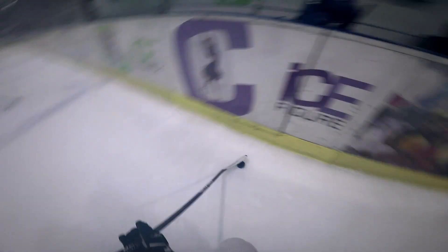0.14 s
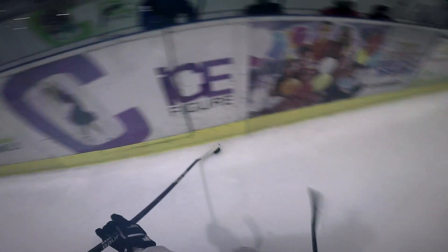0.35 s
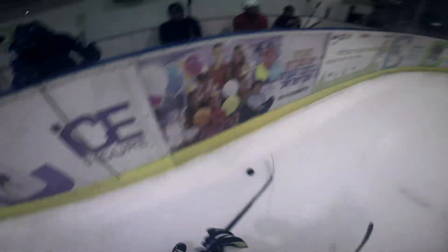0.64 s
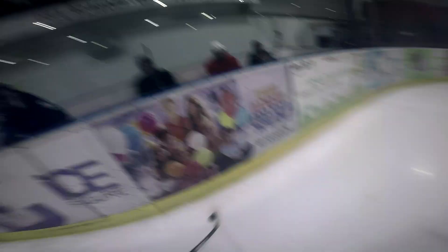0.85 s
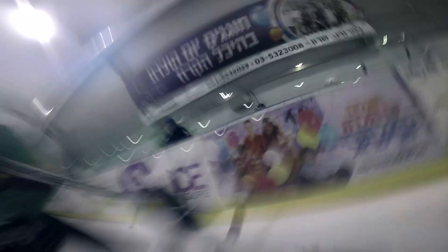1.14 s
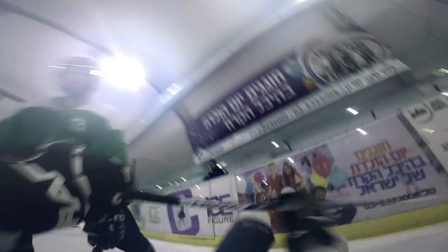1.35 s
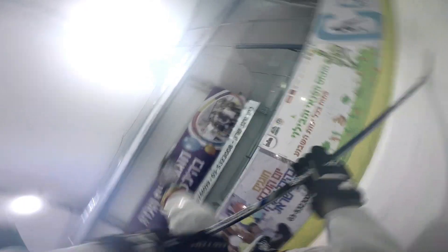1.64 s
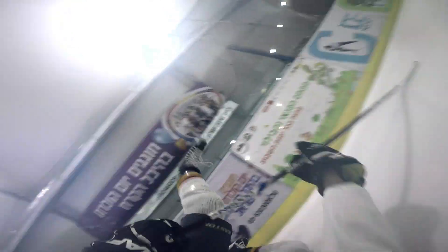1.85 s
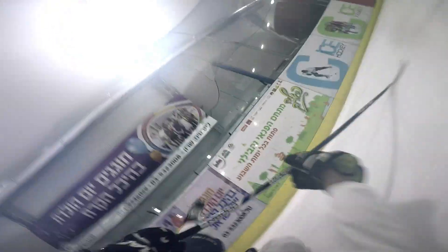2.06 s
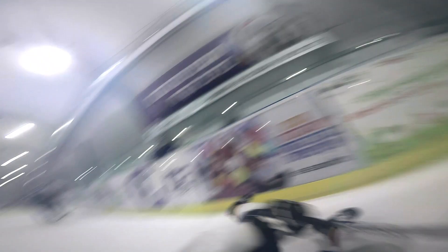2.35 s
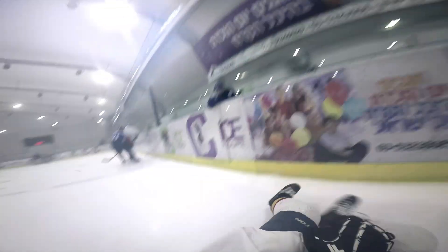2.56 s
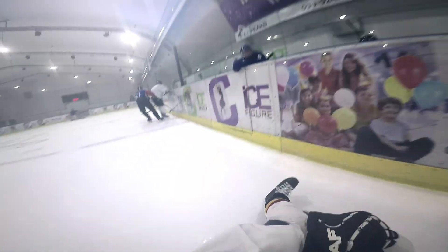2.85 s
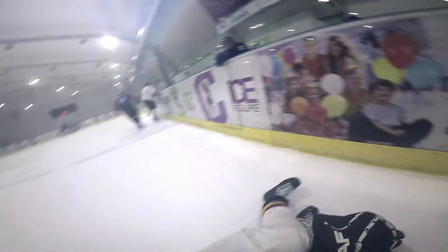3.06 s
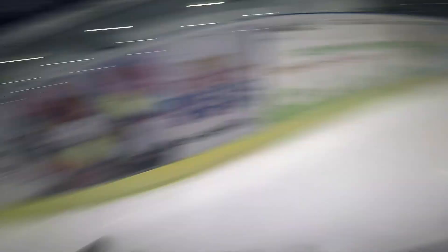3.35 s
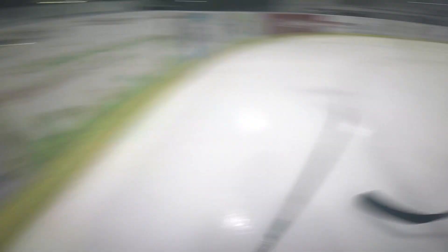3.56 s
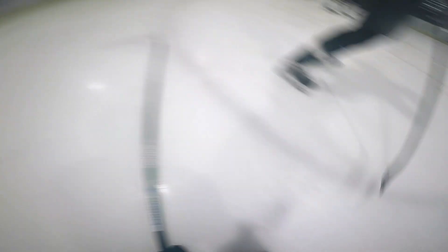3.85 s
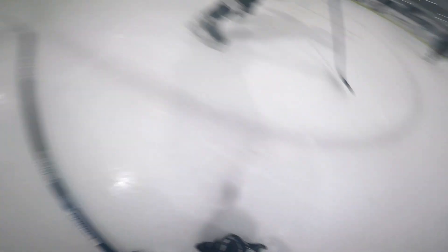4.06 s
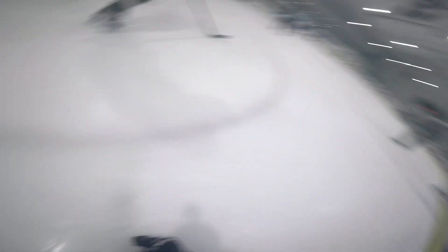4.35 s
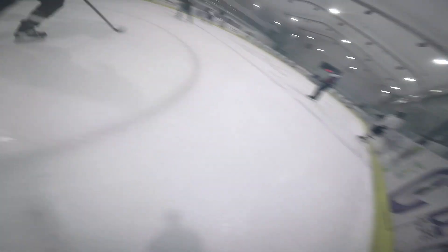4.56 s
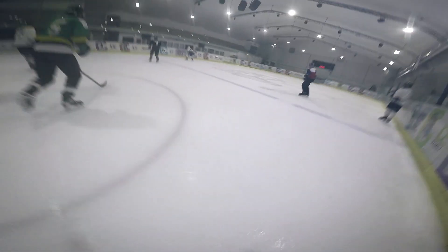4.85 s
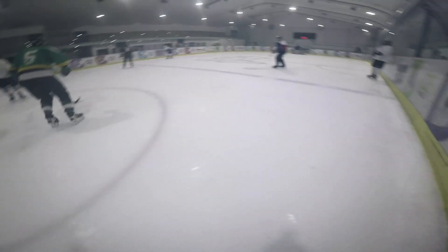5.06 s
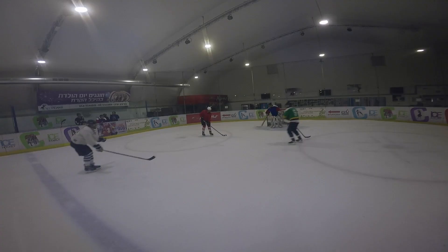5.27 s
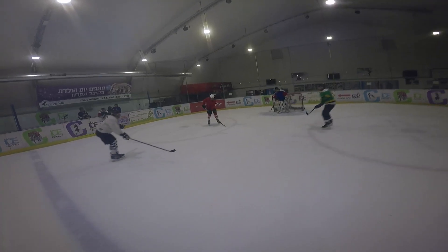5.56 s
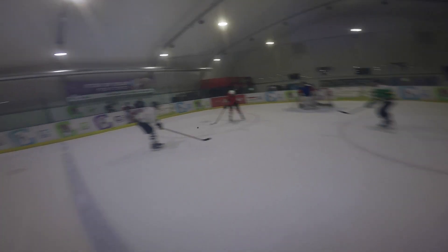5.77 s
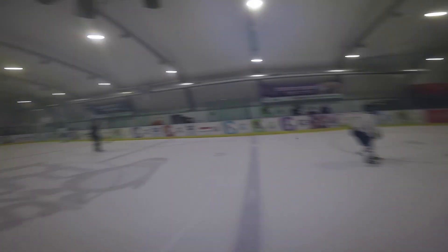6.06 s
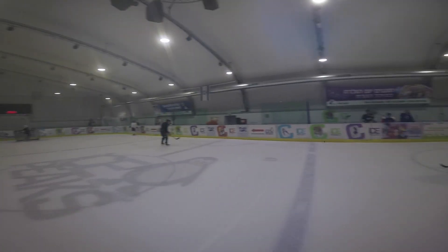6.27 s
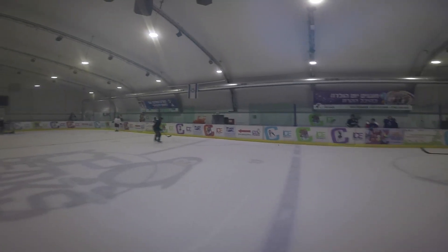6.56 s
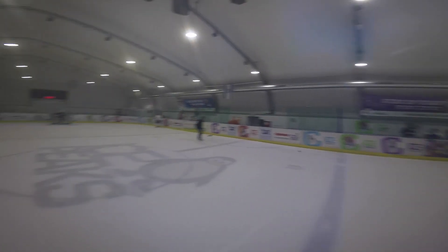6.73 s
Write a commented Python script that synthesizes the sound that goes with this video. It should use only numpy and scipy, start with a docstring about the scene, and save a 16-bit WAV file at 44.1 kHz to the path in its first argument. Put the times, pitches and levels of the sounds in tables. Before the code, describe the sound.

Helmet-level ice hockey: gritty carving, a burst of hard clacks and padded thuds, a hushed fall, then returning scrapes and echoing shots.

```python
"""First you hear skate blades scraping and spraying ice: ice hockey in an indoor rink, heard at a player's helmet.
Sticks, puck and gear clack as short rings; the player collides and falls by the boards with padded thuds.
The skating, tiny ice cracks ringing the blades, drops at the collision and comes back; later shots boom.
Moving air and head motion sway the camera mount as a low rumble, over a dull hall wash and a faint whine."""
import sys
import numpy as np
from scipy import signal
from scipy.fft import rfft
from scipy.io import wavfile
from scipy.ndimage import uniform_filter1d

SR = 44100
rng = np.random.default_rng(int(sys.argv[2]) if len(sys.argv) > 2 else 0)


def digitize_waveform(pressure):
    """Quantize a signal to 16-bit integers and store it at the path in sys.argv[1].

    Rows of a 2-D input are taken as channels; values are limited to [-1, 1].
    """
    field = np.atleast_2d(pressure).T
    bounded = np.clip(field, -1, 1)
    quanta = np.round(bounded * 32767).astype(np.int16)
    wavfile.write(sys.argv[1], SR, quanta)


N = 304147
TIME = np.arange(N) / SR  # seconds

# All levels are relative; most sources also apply a trim.
# Skating sound before the collision: (time [s], scrape level [dB], treble level [dB])
BEFORE_LEVELS = [(0, -26, -30.5), (.07, -26, -42), (.19, -22, -36), (.31, -30.5, -46.5), (.63, -28, -40.5),
                 (.82, -33.5, -53), (1.05, -31, -43), (1.2, -36, -47)]
# Skating sound after it, low at first: (time [s], scrape level [dB], treble level [dB])
AFTER_LEVELS = [(1.29, -55, -60.5), (1.7, -49.5, -55), (2.18, -37, -46.5), (2.32, -32.5, -46),
                (2.56, -32, -53), (2.76, -28.5, -50), (3.04, -31.5, -46), (3.25, -30.5, -48.5),
                (3.35, -36.5, -52.5), (3.99, -34.5, -44), (4.29, -34, -50), (4.47, -28, -45.5),
                (5.02, -32, -51.5), (5.46, -37, -48.5), (5.83, -32.5, -47), (6.26, -33, -53),
                (6.57, -31.5, -58), (6.9, -33, -61)]
CRASH_S, CUT_S = 1.245, 0.042  # when the skating sound starts to drop, and how long the change takes
SCRAPE_DB, SPRAY_DB, WASH_DB = -0.5, 3, -10  # trims on those levels
GLIDE_ENDS_S, HANDOVER_S = 5.33, 0.08  # the player's own glide starts to fade out; length of the fade

# Tone colour of blades scraping: (frequency [Hz], level [dB])
SCRAPE_SPECTRUM = [(300, -16.5), (700, -14.5), (1000, -4.5), (1300, -0.5), (2000, 2.5), (2400, -8),
                   (3100, -4.5), (4000, -17), (5000, -19.5), (8000, -44), (16000, -40)]
# Tone colour of the fine ice spray: (frequency [Hz], level [dB])
SPRAY_SPECTRUM = [(1500, 4), (3000, 0.5), (4200, 1), (5500, -4), (6600, -6), (7700, -2), (8600, -12),
                  (10500, -12.5), (12500, -17.5), (15000, -18), (16000, -45)]
# Resonances of blades and camera shell: (frequency [Hz], width [Hz], level [dB])
BLADE_RESONANCES = [(1580, 19, 0), (1910, 38, -3), (2566, 460, 2.5), (3990, 450, 0.5), (4830, 87, 0),
                    (5890, 660, 0), (6440, 110, -24), (7330, 280, -16), (9760, 770, -1)]
# Tone colour of the other skaters' scrape: (frequency [Hz], level [dB])
OTHERS_SPECTRUM = [(300, -15), (650, -14.5), (900, -1), (1400, 2), (2150, -2.5), (3000, 1), (3500, -4),
                   (4100, -7.5), (5000, -17.5), (8000, -40), (16000, -42)]
# Resonances of the other skaters' blades: (frequency [Hz], width [Hz], level [dB])
OTHERS_RESONANCES = [(1174, 20, -5), (1660, 120, -4), (1854, 75, 6.5), (2370, 94, 7), (2710, 180, 2),
                     (3880, 190, -3), (5820, 120, 13)]
SCRATCH_RATE, SCRATCH_DB = 40, -13.5  # larger chips per s, level before the scrape's loudness curve
SPRAY_MIRROR = 0.42  # strength of the spray's ice reflection, direct sound = 1
SQUEAK_HZ, SQUEAK_OCTAVES = 1905, 0.555  # centre pitch, and range of starting pitches
SQUEAK_S, SQUEAK_DB = 0.028, -14.5  # middle length, level relative to the glide

# A carving blade sings:
# (start [s], length [s], level [dB], centre [Hz], slide [octaves], width [share of the pitch])
BLADE_CARVES = [(0, 0.078, -28.5, 960, 0.14, 0.14), (0.101, 0.23, -31.5, 978, -0.13, .22),
                (0, 0.17, -27, 2310, -0.15, 0.12), (0.122, 0.093, -21, 1890, 0.082, .06),
                (.23, 0.079, -31, 2140, .05, .05), (0.044, 0.086, -34, 6030, -.45, .14),
                (0.549, .11, -31.5, 1954, -0.023, 0.037), (0.672, 0.26, -37, 1930, -0.11, 0.067),
                (2.183, .14, -53, 6740, -0.017, .08), (2.296, 0.31, -31.5, 2010, -0.096, .17),
                (2.35, .12, -55, 11300, .05, .08), (2.777, 0.16, -53, 7200, .06, 0.071),
                (2.877, 0.18, -43, 5360, 0.13, 0.18), (3.047, .17, -47, 7170, 0.016, .06),
                (3.07, .09, -53, 8650, .03, .07), (3.325, 0.17, -33, 1640, 0.091, .13),
                (3.628, .032, -21.5, 1856, -0.028, 0.05), (3.742, 0.25, -32, 1903, .05, 0.13),
                (3.8, 0.26, -36.5, 1597, -.04, .12), (3.861, .12, -40.5, 4360, 0.19, .14),
                (3.87, .17, -52, 7000, 0.00086, 0.092), (3.903, .14, -56, 9700, 0.15, 0.11),
                (4.599, .8, -41, 1503, 0, 0.057), (5.672, 0.17, -37, 7620, -0.012, 0.075),
                (6.745, 0.18, -29, 1587, 0.021, 0.15)]
# An edge skids sideways and throws snow: (start [s], length [s], level [dB], fine powder level [dB])
EDGE_SKIDS = [(.0, 0.14, -46, 10), (0.088, 0.12, -32.5, -6), (0.167, 0.065, -49, 5.5),
              (0.577, 0.3, -50, 3.5), (0.978, 0.093, -53.5, 12.5), (2.298, 0.22, -52.5, 2.5),
              (2.764, 0.21, -43.5, -19), (3.078, 0.22, -42.5, -21), (3.58, 0.16, -46.5, -13),
              (3.86, 0.11, -55, -8), (5.564, .11, -47, -21), (5.667, 0.074, -30, -17),
              (5.732, 0.071, -27, -25), (6.044, 0.058, -37.5, -25)]
# Tone colour of thrown snow: (frequency [Hz], level [dB])
SNOW_SPECTRUM = [(800, -4), (1600, 10), (2200, -4), (2900, 8.5), (3900, 6.5), (4700, -1.5), (5800, -0.5),
                 (7600, -7), (8600, -13), (11000, -17.5), (15000, -60)]
# Tone colour of fine powder: (frequency [Hz], level [dB])
POWDER_SPECTRUM = [(2000, -31), (4500, 6), (6300, 1.5), (7800, -0.5), (8800, -12), (10300, -6),
                   (12000, -14), (15000, -13), (16000, -30)]

# Stick, puck and gear clacks: (time [s], level [dB], main ring [Hz], second ring [Hz],
# second ring level [dB], crack level [dB], low knock level [dB])
CLACK_HITS = [(0.467, -14.5, 1670, 2170, -12, -30, -30), (.534, -6.5, 1880, 1400, -7, -22.5, -28),
              (0.546, -10, 1340, 2100, -12, -36, -36), (0.685, -11.5, 2000, 2730, -10, -25, -19),
              (0.702, -9.5, 1840, 2660, -14, -20.5, -17), (.764, -16, 1550, 2450, -1, -9.5, -3.5),
              (0.961, -29.5, 870, 1500, -7, -32, 5), (1.022, -3, 2190, 2770, -5, -29, -34),
              (1.069, -15, 1930, 1290, 1, -11.5, -9), (1.154, -8, 2710, 2150, -14, -13.5, -25),
              (1.169, -8, 1470, 2140, 1, -42, -35), (1.179, -12, 2090, 1360, -2, -33, -13),
              (1.197, -5.5, 1730, 2660, -9, -31, -14), (1.211, -13, 1860, 2600, -13, -28, -13),
              (1.22, -19, 1910, 2670, -5, -35, -30), (1.2528, 4.5, 2443, 1810, 0.5, -17, -28),
              (1.495, -26, 2090, 2530, -12, -30, -13), (1.511, -22.5, 1020, 2800, -5, -17, -8),
              (1.531, -18, 1830, 2590, -16, -16, -14), (1.589, -27, 1460, 2160, 1.5, -14, -20),
              (1.681, -0.5, 1880, 2650, -8.5, -26, -19), (1.748, -29, 2100, 2870, -6, -7, -27),
              (1.836, -38, 2020, 2820, 5, -28, -30), (1.861, -36, 1960, 2980, -3, -15, -24),
              (2.112, -15, 2220, 2620, -9, -44, -28), (2.17, -20, 2040, 3020, -1.5, -15, -18),
              (2.302, -25, 1880, 2900, -10, -20, -30), (2.335, -8, 1780, 2550, -9, -17, -49),
              (2.3615, -20, 1990, 2600, -9, -24, -35), (2.6, -15, 2700, 1660, -3, -28, -37),
              (3.116, -17, 2070, 2640, -2, -30, -35), (3.2857, -4.5, 1570, 3280, -8, -27, -23.5),
              (3.344, -26.5, 2650, 3600, -5, -11, -29), (3.638, -11, 1800, 1400, -12, -48, -44),
              (5.556, -23.5, 2780, 1800, -12, -14, -28), (5.577, -27, 2920, 5700, -8, -13, -33),
              (5.618, -31, 2800, 5800, -4, -16, -27), (6.316, -11.5, 1450, 3750, -12, -21, -26),
              (6.3312, -8.5, 3750, 2460, -2, -32, -41), (6.339, -15, 1650, 2650, 2, -30, -33)]
# Notes available to every clack: (frequency [Hz], level [dB], time to fall 60 dB [s])
CLACK_RESONANCES = [(1146, -3, 0.032), (1463, 8, 0.011), (1714, -4.5, 0.016), (1680, -11, 0.0046),
                    (1960, 5, 0.043), (2587, 2.5, 0.019), (2736, -11.5, 0.039), (3110, 2.5, 0.017),
                    (4300, -12, 0.027), (4600, -36, 0.006)]
# Tone colour of the sharp crack: (frequency [Hz], level [dB])
CRACK_SPECTRUM = [(1000, -7), (3000, 12), (4200, 13.5), (5100, 3.5), (6400, 6), (7800, -4.5), (8700, -7.5),
                  (11500, -10), (16000, -30)]
# A harder blow stays in contact and rings shorter: 60 dB decay at 0 dB, and the level step that halves it
RING_T60_S, RING_HALVING_DB = 0.017, 42

# Dead raps of plastic gear against the helmet: (time [s], level [dB], pitch [Hz])
PLASTIC_RAPS = [(0.778, -8.5, 1250), (1.1988, 2.5, 1390), (1.2345, -11, 1500), (1.2438, -3, 1450),
                (1.6208, -13.5, 1440), (1.887, -11.5, 1350)]
RAP_T60_S = 0.0041  # 60 dB decay of the upper note
RAP_LOW_RATIO, RAP_LOW_DB = 0.63, -10.5  # lower note relative to the upper one

# Padded bodies hit boards and ice: (time [s], level [dB], pitch [Hz], slap of cloth level [dB])
PADDED_THUDS = [(0.751, -11.5, 195, -1.5), (0.764, -17, 290, -16), (.961, -10, 280, -6),
                (1.022, -8, 150, -6), (1.046, -20.5, 190, 3), (1.195, -7, 167, -17), (1.241, -13, 149, -25),
                (1.575, -12, 185, -23), (1.616, -29, 252, -2), (1.684, -7.5, 178, -16),
                (1.704, -31, 252, -18), (1.733, -11, 200, -15), (1.861, -19, 177, -28),
                (1.886, -18.5, 225, -9.5), (2.067, -20, 160, -12), (2.114, -16.5, 367, -11),
                (2.117, -17, 260, -13), (2.221, -34, 253, -12), (2.467, -25.5, 237, -15),
                (3.286, -20.5, 274, -9), (3.742, -22.5, 255, -6)]
# Gear crushed and dragged in the fall: (start [s], length [s], level [dB])
GEAR_SCUFFS = [(1.154, 0.035, -30), (1.195, 0.054, -27), (1.284, 0.014, -49), (1.336, 0.018, -70),
               (1.5, 0.12, -42), (1.844, 0.073, -40.5)]

# Shots and stick slaps out on the rink: (time [s], level [dB], boom level [dB], boom pitch [Hz],
# treble level [dB], time for the crunch to fall 60 dB [s])
RINK_SHOTS = [(2.6, -30.5, 4.5, 262, 8, 0.034), (4.145, -26.5, -5, 296, -18, 0.13),
              (4.266, -18, -6, 333, -18, 0.097), (4.282, -21.5, -4, 380, 0.5, 0.27),
              (4.295, -38, 2, 272, 1, 0.068), (4.306, -36, 6, 238, -8, 0.066),
              (4.317, -27.5, 2.5, 400, 5, 0.075), (4.339, -24, -5, 356, -3, 0.15),
              (4.412, -42, 11, 275, -9, 0.055), (5.585, -36, -17, 304, 7, 0.14),
              (6.314, -28, 9, 333, -2, 0.075), (6.331, -20, -6, 343, -6.5, 0.1),
              (6.363, -31.5, 3.5, 340, -12, 0.043), (6.403, -21, -8, 255, -10, 0.058),
              (6.55, -36.5, 12.5, 240, -5, 0.06)]
# Resonances of a slapped stick: (frequency [Hz], width [Hz], level [dB])
STICK_RESONANCES = [(858, 35, 21.5), (1300, 190, 10), (2310, 720, 11), (4000, 170, 11)]
# Tone colour of the boards' rattle and of slapped cloth: (frequency [Hz], level [dB])
BOOM_SPECTRUM = [(80, -6), (160, -12.5), (250, 2.5), (340, -1), (480, 0.5), (680, -5.5), (950, -3.5),
                 (2000, -8), (5000, -61)]
# The struck panel: 60 dB decay, trim of its note and of its dull rattle
BOARD_T60_S, BOARD_DB, RUMBLE_DB = 0.054, 1, -1

# Air flowing past the helmet: (time [s], level [dB])
AIRFLOW_LEVELS = [(0, -13), (.72, -9), (.9, -14), (1.28, -8.5), (1.38, -35.5), (1.6, -22), (2.45, -14.5),
                  (2.56, -20), (3.8, -23), (5.35, -18.5), (5.65, -12.5), (6.25, -20.5), (6.9, -20.5)]
# The airflow drops for a moment: (start [s], length [s], change [dB])
AIR_LULLS = [(0.21, 0.094, -15), (1.946, 0.089, -6), (2.524, 0.12, -11), (2.937, 0.1, -10),
             (3.115, 0.11, -11), (3.456, 0.051, -18), (6.223, 0.11, -3)]
# Strides and jerks of the head: (start [s], length [s], sway level [dB], shell drone level [dB])
HEAD_LURCHES = [(0.021, 0.12, -6.5, -45), (0.163, 0.082, -7, -57), (0.295, 0.049, -9.5, -49),
                (0.457, 0.057, -3, -39), (0.536, 0.2, -10.5, -30), (0.762, 0.061, -10, -25),
                (1.039, 0.078, -3, -32), (1.145, 0.08, -5, -28.5), (1.48, 0.13, -4, -35),
                (1.59, 0.21, -21.5, -31), (1.868, 0.048, -12, -24.5), (1.9, 0.11, -23, -38),
                (2.029, 0.18, -12.5, -30.5), (2.264, 0.084, -9, -29.5), (2.392, 0.046, -8.5, -33),
                (2.444, 0.058, -6, -30), (2.767, 0.13, -16, -73), (3.186, 0.051, -14.5, -28),
                (3.275, 0.08, -4, -36.5), (3.372, 0.11, -15.5, -48), (3.635, 0.18, -15.5, -70),
                (4.236, 0.036, -11.5, -55), (4.733, 0.19, -15.5, -69), (5.471, 0.071, -8, -45),
                (5.674, 0.11, -7, -43), (5.82, 0.094, -18, -42), (5.975, 0.22, -7, -67),
                (6.323, 0.12, -14, -43), (6.796, 0.14, -17.5, -45)]
# Tone colour of the gusts: (frequency [Hz], level [dB])
WIND_SPECTRUM = [(3, -44), (12, -2.5), (22, 9), (35, -6), (50, -9), (70, -31.5), (100, -29), (200, -54),
                 (600, -80)]
SWAY_HZ, DRONE_HZ = 35.74, 120.7  # middle notes of the mount and of the helmet shell
FLUTTER_DEPTH, FLUTTER_RATE = 0.37, 23.5  # depth 0-1, about so many changes per s
# Jolts through the helmet: (time [s], level [dB])
HELMET_JOLTS = [(.758, 1), (1.024, 4), (1.17, -9), (1.246, -2.5), (1.493, -3), (1.584, -5.5), (1.685, -20),
                (1.735, -8), (1.863, -4), (2.079, -8), (5.505, -11)]
JOLT_HZ = 122.8  # pitch at the start of a jolt
MOUNT_TRAVEL = 0.81  # largest swing of the mount, as a share of full scale

# How long the rink echoes: (frequency [Hz], time to fall 60 dB [s])
RINK_DECAY = [(200, 2), (1000, 4), (2500, 4.45), (6000, 2.35), (14000, 0.31)]
# Tone colour of the hall's wash: (frequency [Hz], level [dB])
HALL_SPECTRUM = [(60, 16.5), (120, 2), (200, 4), (300, 0.5), (450, -6.5), (700, -6.5), (1200, 0),
                 (3000, -16), (8000, -19), (16000, -34)]
WASH_TOP_DB = -43  # ceiling of the wash level, before its gentle wavering
# The faint high whine drops after the collision, then recovers: (time [s], level [dB])
WHINE_LEVELS = [(0, -72), (1.2, -72), (1.35, -88), (1.9, -82), (2.6, -69), (6.9, -65)]
WHINE_HZ, TOP_HZ = 15080, 15500  # pitch of the whine, upper limit of the final sound


def skates():
    """Edges chip ice, squeak and ring the blades; late on, other skaters replace the player's own glide."""
    scrape_db, spray_db = skating_levels()
    # The chatter of the edge shakes both the scrape and the fine spray.
    chatter_db = 0.64 * walk(19) + 0.42 * walk(130)

    fracture = chips(rate=1500, spread_db=1.5) + 1.57 * noise()
    glide = colour(fracture, SCRAPE_SPECTRUM, BLADE_RESONANCES)
    glide = glance(glide, share=0.19, detour_s=0.00158)
    own = unit(glide + undb(SQUEAK_DB) * squeaks())
    far_fracture = chips(rate=900, spread_db=2.0) + 2.6 * noise()
    others = colour(far_fracture, OTHERS_SPECTRUM, OTHERS_RESONANCES)
    away = np.clip((TIME - GLIDE_ENDS_S) / HANDOVER_S, 0, 1)
    scrape = np.sqrt(1 - away) * own + np.sqrt(away) * others

    fine_chips = chips(rate=2500, spread_db=1.5) + noise()
    spray = colour(fine_chips, SPRAY_SPECTRUM, BLADE_RESONANCES)
    spray = glance(spray, share=SPRAY_MIRROR, detour_s=0.000437)

    snag_starts = 1.0 * (rng.random(N) < SCRATCH_RATE / SR)
    snags = signal.fftconvolve(snag_starts, fade(TIME[:SR // 20], 0.016))[:N]
    scratch = undb(SCRATCH_DB) * colour(snags * noise(), SCRAPE_SPECTRUM, BLADE_RESONANCES)

    scrape_gain = undb(scrape_db + chatter_db + SCRAPE_DB)
    spray_gain = undb(spray_db + chatter_db + 1.25 * walk(24) + SPRAY_DB)
    return (scrape + scratch) * scrape_gain + spray * spray_gain


def skating_levels():
    """Scrape and treble levels in dB: both drop at the collision and come back over about a second."""
    crashed = np.clip((TIME - CRASH_S) / CUT_S, 0, 1)
    pairs = zip(curves(BEFORE_LEVELS), curves(AFTER_LEVELS))
    return [before + crashed * (after - before) for before, after in pairs]


def squeaks():
    """A gliding edge catches again and again; each catch rings briefly at its own sliding pitch; rms 1."""
    out = np.zeros(N)
    for when, place, size, slide in rng.random((300, 4)):
        stroke = swell(SQUEAK_S * (0.5 + size)) ** 2
        start_octave = SQUEAK_OCTAVES * (place - 0.5)
        slide_octaves = 0.16 * (slide - 0.5) * np.linspace(0, 1, len(stroke))
        hz = SQUEAK_HZ * 2 ** (start_octave + slide_octaves)
        add(out, when * N / SR, size ** 2 * stroke * np.sin(2 * np.pi * np.cumsum(hz) / SR))
    return unit(out)


def glance(x, share, detour_s):
    """The ice mirrors the sound; as the skater moves, the changing delay sweeps a comb through it."""
    lag_s = detour_s * np.exp(0.17 * walk(4.05))
    return unit(x + share * np.interp(TIME - lag_s, TIME, x))


def edges():
    """A loaded blade sticks and slips, so it sings; a skid shaves echoing snow and powder heard only nearby."""
    song, skids, fine = np.zeros((3, N))
    snow = colour(chips(rate=2500, spread_db=5.5) + 1.55 * noise(), SNOW_SPECTRUM)
    powder = colour(chips(rate=6400, spread_db=1.0) + noise(), POWDER_SPECTRUM)
    powder = powder * undb(4.1 * walk(70))
    for s, length, db, powder_db in EDGE_SKIDS:
        stroke = swell(length)
        add(skids, s, undb(db) * stroke * piece(snow, s, stroke))
        add(fine, s, undb(db + powder_db) * stroke * piece(powder, s, stroke))
    for s, length, db, hz, slide, width in BLADE_CARVES:
        stroke = swell(length)
        pitch = hz * 2 ** (slide * np.linspace(-0.5, 0.5, len(stroke)))
        add(song, s, undb(db - 4.0) * stroke * sing(pitch, width * hz))
    return song + skids + fine + rink(undb(-4.0) * skids)


def sing(hz, width):
    """Stick-slip noise in a narrow band that follows the pitch hz."""
    smooth = signal.butter(2, np.clip(width / 2, 5, SR / 4), fs=SR, output="sos")
    slow_noise = unit(signal.sosfilt(smooth, rng.standard_normal((2, 2 * SR))))
    real, imag = slow_noise[:, -len(hz):]  # the end, where the filter has settled
    phase = 2 * np.pi * np.cumsum(hz) / SR
    return real * np.cos(phase) + imag * np.sin(phase)


def clacks():
    """Hard contacts: a brief crack, two main rings with the modes near them, a low knock and a rattle."""
    out, t = np.zeros(N), TIME[:SR // 8]
    hz, mode_db, t60 = np.transpose(CLACK_RESONANCES)[:, :, None]
    cracks = colour(noise(), CRACK_SPECTRUM)
    knocks = band(band(noise(), 660, 820), 760, 1050)
    rattles = colour(noise(), SCRAPE_SPECTRUM)
    for s, db, main_hz, second_hz, second_db, crack_db, knock_db in CLACK_HITS:
        # Where the blow lands sets the strength of each mode: a random draw, favouring the main ring.
        weight = undb(mode_db - 8 * np.log2(hz / main_hz) ** 2) * rng.normal(0.7, 0.45, hz.shape)
        modes = np.sum(weight * np.sin(2 * np.pi * hz * t) * fade(t, t60), axis=0)
        body = undb(-4) * modes / np.sqrt(np.sum(weight ** 2))
        pair = np.sin(2 * np.pi * main_hz * t) + undb(second_db) * np.sin(2 * np.pi * second_hz * t)
        ring = undb(-2.5) * pair * fade(t, RING_T60_S * 2 ** (-db / RING_HALVING_DB))
        crack = undb(crack_db + 8.5) * piece(cracks, s, t) * fade(t, 0.012)
        knock = undb(knock_db - 5) * piece(knocks, s, t) * fade(t, 0.072)
        rattle = undb(-21) * piece(rattles, s, t) * fade(t, 0.028)
        attack = 1 - np.exp(-t / 0.00065)
        add(out, s, undb(db + 1.5) * (body + ring + crack + knock + rattle) * attack)
    return out


def raps():
    """Plastic pressed against padding hardly rings: two notes that die within a few cycles."""
    out, t = np.zeros(N), TIME[:SR // 20]
    attack = 1 - np.exp(-t / 0.0004)
    for s, db, hz in PLASTIC_RAPS:
        high = np.sin(2 * np.pi * hz * t) * fade(t, RAP_T60_S)
        low = np.sin(2 * np.pi * hz * RAP_LOW_RATIO * t) * fade(t, RAP_T60_S / RAP_LOW_RATIO)
        add(out, s, undb(db + 5.5) * (high + undb(RAP_LOW_DB) * low) * attack)
    return out


def thuds():
    """Padding gives a soft push, a damped low note and a slap of cloth; the helmet shell hums briefly."""
    out, t = np.zeros(N), TIME[:SR // 4]
    cloth = colour(noise(), BOOM_SPECTRUM)
    shell = undb(-13.5) * np.sin(2 * np.pi * 258 * t) * fade(t, 0.14)
    soft_attack = 1 - np.exp(-t / 0.0037)
    slap_attack = 1 - np.exp(-t / 0.00098)
    for s, db, hz, cloth_db in PADDED_THUDS:
        note = np.sin(2 * np.pi * hz * t) * fade(t, 0.055)
        slap = undb(cloth_db) * piece(cloth, s, t) * fade(t, 0.071)
        add(out, s, undb(db - 5.5) * ((note + shell) * soft_attack + slap * slap_attack))
    return out


def scuffs():
    """Gear crushed or dragged against boards and ice gives a run of small, uneven ticks."""
    out = np.zeros(N)
    grit = colour(chips(rate=700, spread_db=3.5) + 0.4 * noise(), SCRAPE_SPECTRUM, BLADE_RESONANCES)
    for s, length, db in GEAR_SCUFFS:
        stroke = swell(length)
        add(out, s, undb(db) * stroke * piece(grit, s, stroke))
    return out


def shots():
    """Sticks crunch over ice and the puck booms on a board panel; crunch and rattle ring on in the hall."""
    crunches, rattles, notes = np.zeros((3, N))
    t = TIME[:SR // 4]
    crunch = chips(rate=1500, spread_db=1.3) + 0.72 * noise()
    slap = colour(crunch, SCRAPE_SPECTRUM, STICK_RESONANCES)
    crack = colour(crunch, SNOW_SPECTRUM)
    boom = colour(noise(), BOOM_SPECTRUM)
    attack = 1 - np.exp(-t / 0.0016)
    for s, db, boom_db, hz, treble_db, t60 in RINK_SHOTS:
        blow = piece(slap, s, t) + undb(treble_db) * piece(crack, s, t)
        add(crunches, s, undb(db - 1.0) * blow * fade(t, t60) * attack)
        panel = undb(db + boom_db) * fade(t, BOARD_T60_S) * attack
        add(notes, s, undb(BOARD_DB) * panel * np.sin(2 * np.pi * hz * t))
        add(rattles, s, undb(RUMBLE_DB) * panel * piece(boom, s, t))
    echo = rink(undb(-5.5) * crunches + undb(0.5) * rattles)
    return crunches + notes + rattles + echo


def mount():
    """Fluttering air and head lurches sway the springy mount; a lurch also makes the helmet shell drone."""
    push, rub, lull_db = np.zeros((3, N))
    for s, length, sway_db, drone_db in HEAD_LURCHES:
        add(push, s, undb(sway_db) * swell(length))
        add(rub, s, undb(drone_db + 0.5) * swell(length) ** 0.81)
    for s, length, db in AIR_LULLS:
        add(lull_db, s, db * swell(length) ** 2)
    flutter = 1 + FLUTTER_DEPTH * np.tanh(3.8 * walk(FLUTTER_RATE))
    air = undb(curves(AIRFLOW_LEVELS)[0] + lull_db) * flutter
    # The stronger of air and lurch drives the mount.
    sway = waver(SWAY_HZ, spread=0.2284, rate=30.33) * np.maximum(air, push)
    gusts = colour(noise(), WIND_SPECTRUM) * np.maximum(air, undb(-3) * push)
    drone_tone = waver(DRONE_HZ, spread=0.0408, rate=21.5) * undb(2.5 * walk(30))
    drone_noise = band(band(noise(), 100, 30), DRONE_HZ, 32)
    drone = drone_tone + undb(-1.5) * drone_noise
    drone_level = undb(-5.0) * rub + undb(-60.5)  # a trace of drone is always there
    return undb(-2.0) * sway + undb(-6.5) * gusts + drone_level * drone


def jolts():
    """A blow drives the mount stiffly at first, then it settles to its own low note."""
    out, t = np.zeros(N), TIME[:SR // 3]
    hz = SWAY_HZ + (JOLT_HZ - SWAY_HZ) * np.exp(-t / 0.01344)
    attack = 1 - np.exp(-t / 0.023)
    shake = np.sin(2 * np.pi * np.cumsum(hz) / SR) * fade(t, 0.32) * attack
    for s, db in HELMET_JOLTS:
        add(out, s, undb(db) * shake)
    return out


def stiffen(x):
    """The mount stiffens smoothly toward the end of its travel."""
    return x / (1 + (x / MOUNT_TRAVEL) ** 6) ** (1 / 6)


def wash():
    """The dull wash of the hall wavers gently; it drops sharply after the collision, then recovers."""
    scrape_db, _ = skating_levels()
    level_db = np.minimum(scrape_db + WASH_DB, WASH_TOP_DB) + 2.0 * walk(13)
    return colour(noise(), HALL_SPECTRUM) * undb(level_db)


def whine():
    """A faint high tone of fixed pitch, a pure sine that changes only in level."""
    return undb(curves(WHINE_LEVELS)[0]) * np.sin(2 * np.pi * WHINE_HZ * TIME)


def rink(x):
    """Diffuse echo of the hall, starting at the near boards; the treble dies first."""
    t, tail = TIME[:2 * SR], 0
    limits = np.geomspace(100, 16000, 9)  # edges of eight pitch bands, Hz
    for lo, hi in zip(limits, limits[1:]):
        bandpass = signal.butter(2, (lo, hi), "band", fs=SR, output="sos")
        grain = signal.sosfilt(bandpass, rng.standard_normal(len(t)))
        tail = tail + grain * fade(t, at_hz(RINK_DECAY, np.sqrt(lo * hi)))
    tail = tail * (1 - np.exp(-t / 0.016))
    return signal.fftconvolve(x, tail / np.sqrt(np.sum(tail ** 2)))[:N]


def chips(rate, spread_db):
    """Ice fractures at random moments, about rate per second: many tiny, a few large; rms 1."""
    size = undb(spread_db * np.minimum(rng.exponential(size=N), 5))
    return unit((rng.random(N) < rate / SR) * size * noise())


def colour(x, points, modes=()):
    """Give x a smooth spectrum with resonances on top; rms 1."""
    f = np.arange(N // 2 + 1) * SR / N
    peaks = 1 + sum(undb(db) / (1 + (2 * (f - hz) / width) ** 2) for hz, width, db in modes)
    return unit(np.fft.irfft(rfft(x) * undb(at_hz(points, f)) * peaks, N))


def band(x, hz, width):
    """A two-pole resonance; rms 1."""
    return unit(signal.lfilter(*signal.iirpeak(hz, hz / width, fs=SR), x))


def waver(hz, spread, rate):
    """A tone whose pitch wanders by at most a factor exp(spread), about rate times a second; rms 1."""
    wandering_hz = hz * np.exp(spread * np.tanh(walk(rate)))
    return np.sqrt(2) * np.sin(2 * np.pi * np.cumsum(wandering_hz) / SR)


def walk(rate):
    """Smooth chance that changes about rate times a second; rms 1."""
    k = max(int(SR / rate), 2)
    return unit(uniform_filter1d(uniform_filter1d(noise(), k), k))


def noise():
    """White noise: equal strength at every pitch."""
    return rng.standard_normal(N)


def swell(length):
    """A stroke that rises and falls over length seconds."""
    return np.sqrt(np.hanning(max(int(length * SR), 8)))


def fade(t, t60):
    """Exponential decay, 60 dB in t60 seconds."""
    return np.exp(-np.log(1000) * t / t60)


def add(out, s, x):
    """Mix x into out at time s."""
    i = max(int(s * SR), 0)
    out[i:i + len(x)] += x[:N - i]


def piece(x, s, t):
    """The stretch of x that starts at s and is as long as t, wrapping round at the end."""
    return np.take(x, int(s * SR) + np.arange(len(t)), mode="wrap")


def curves(table):
    """The columns of a table after the time, as one value per sample."""
    s, *columns = np.transpose(table)
    return [np.interp(TIME, s, c) for c in columns]


def at_hz(points, hz):
    """Read (frequency, value) points on a log-frequency axis."""
    f, value = np.transpose(points)
    return np.interp(np.log(np.maximum(hz, 1)), np.log(f), value)


def undb(db):
    """Decibels to gain."""
    return 10 ** (np.asarray(db) / 20)


def unit(x):
    """Scale to rms 1."""
    return x / np.sqrt(np.mean(x ** 2))


def scene():
    """Everything that reaches the helmet; the near contacts also echo faintly in the rink."""
    contacts = clacks() + raps() + thuds() + scuffs()
    skating = skates() + edges()
    echo = undb(-34) * rink(contacts)
    shaking = stiffen(mount() + jolts())
    mix = skating + contacts + echo + shots() + shaking + wash() + whine()
    return mix[None]


def record(dry):
    """The camera flattens peaks beyond full scale and cuts the top."""
    low_pass = signal.ellip(8, 0.2, 70, TOP_HZ, fs=SR, output="sos")
    return signal.sosfilt(low_pass, np.clip(dry, -1, 1))


dry = scene()
out = record(dry)
digitize_waveform(out)
```